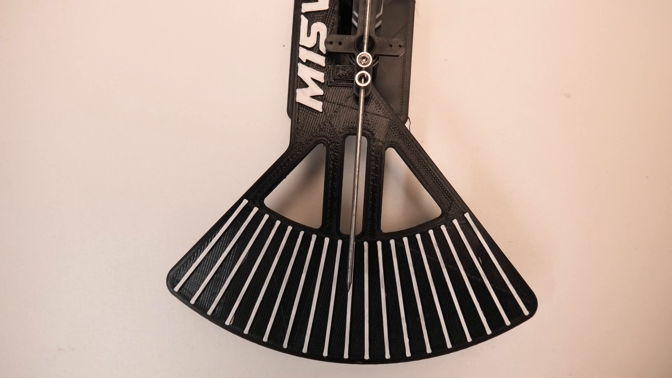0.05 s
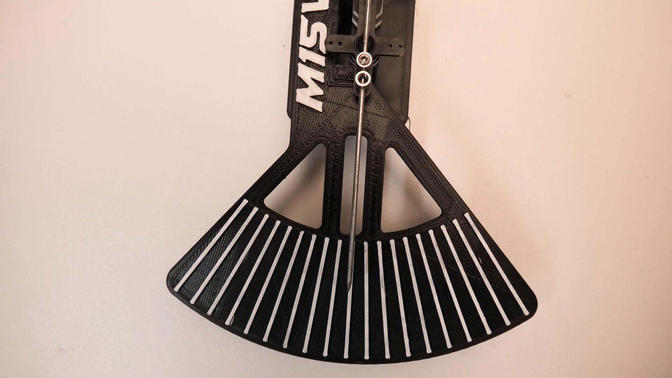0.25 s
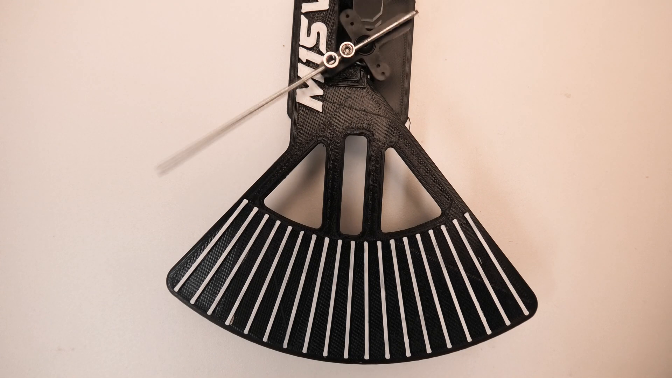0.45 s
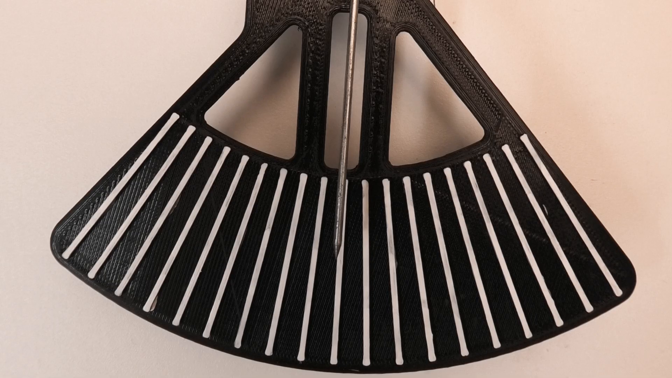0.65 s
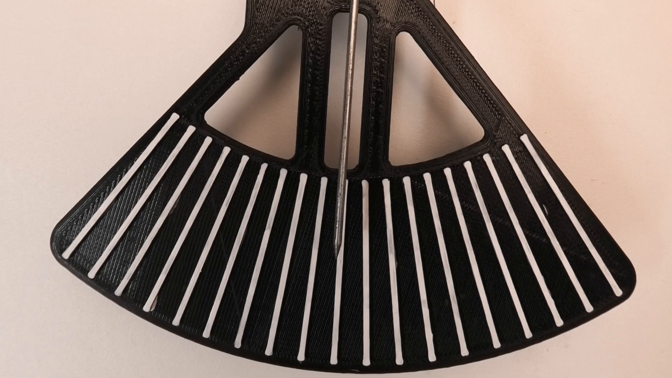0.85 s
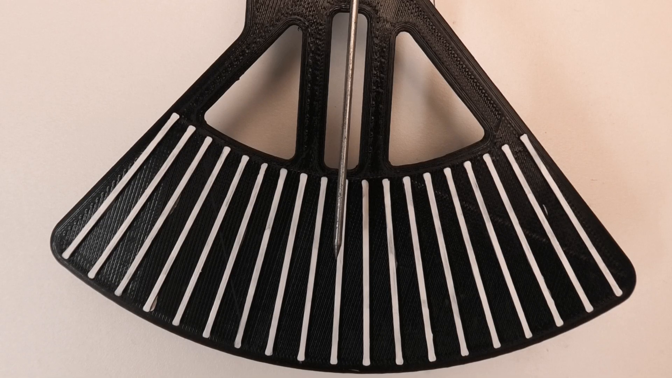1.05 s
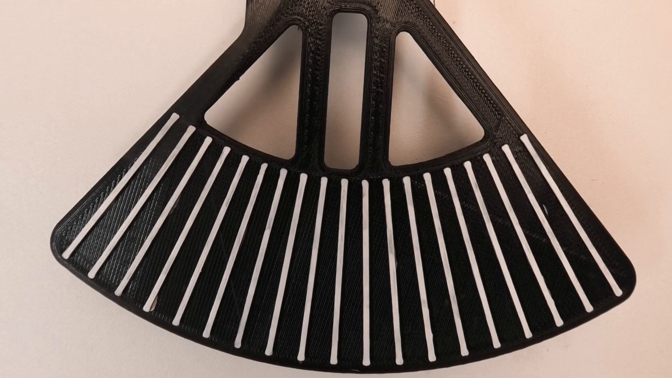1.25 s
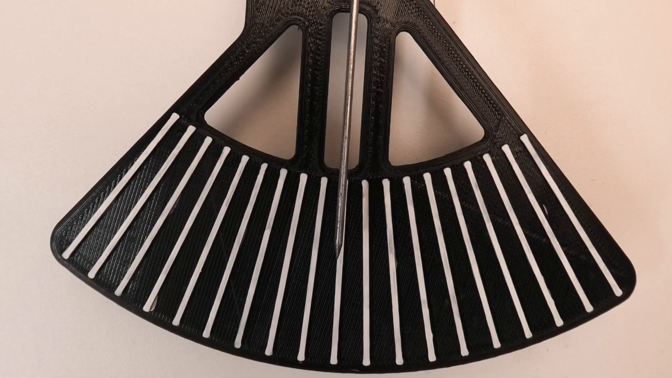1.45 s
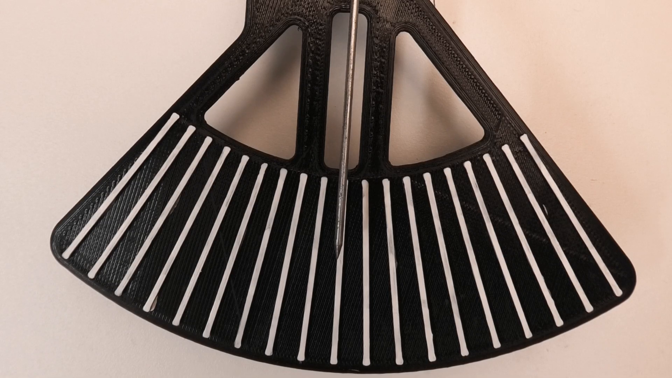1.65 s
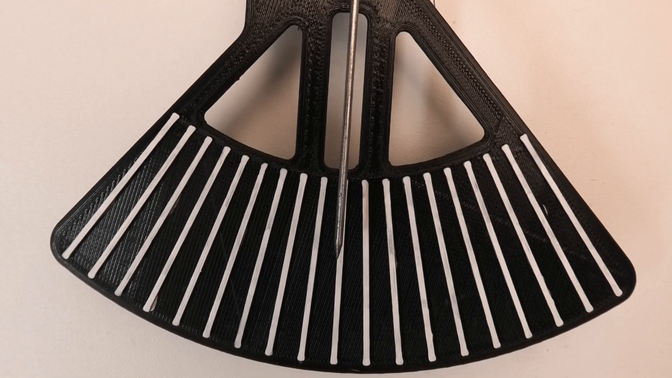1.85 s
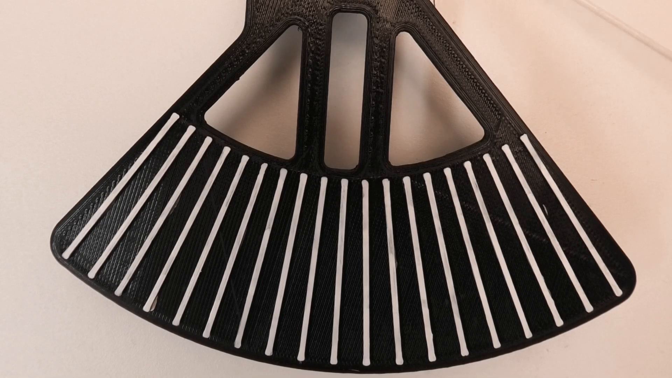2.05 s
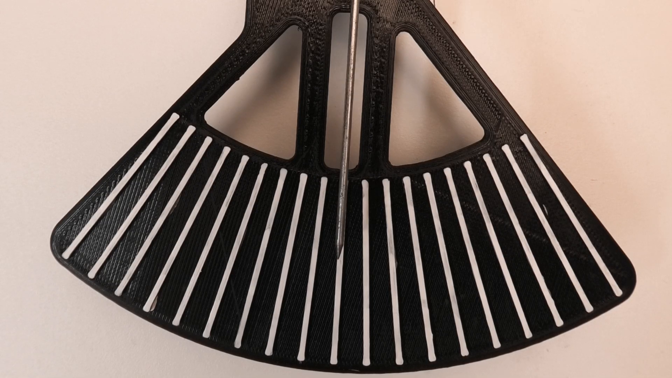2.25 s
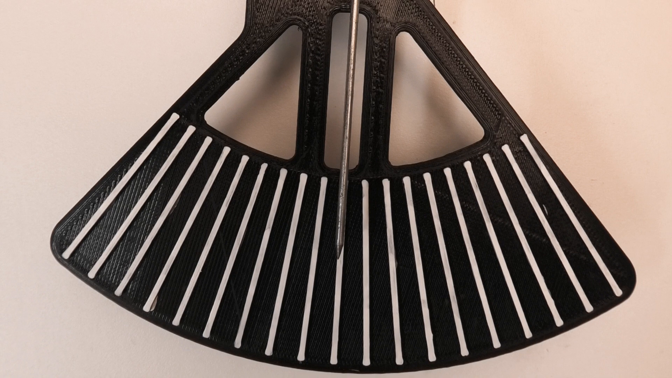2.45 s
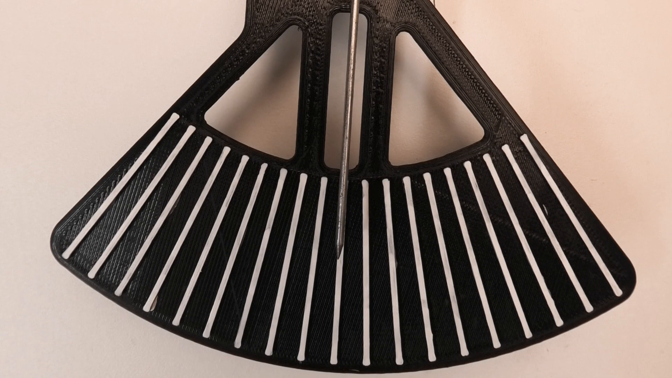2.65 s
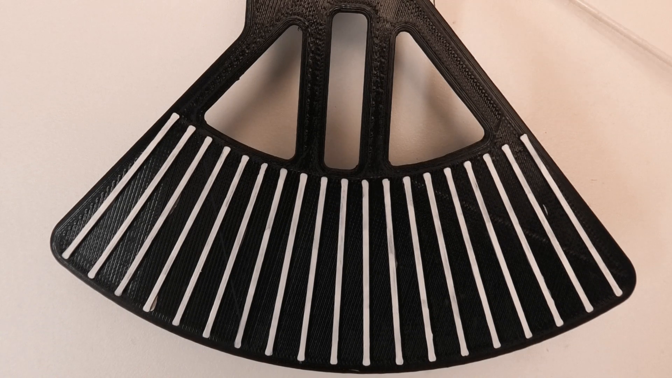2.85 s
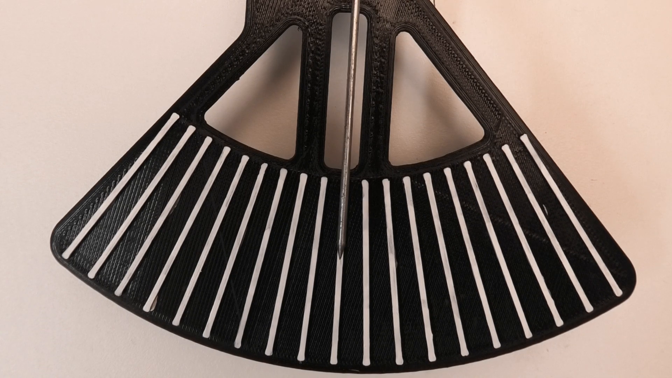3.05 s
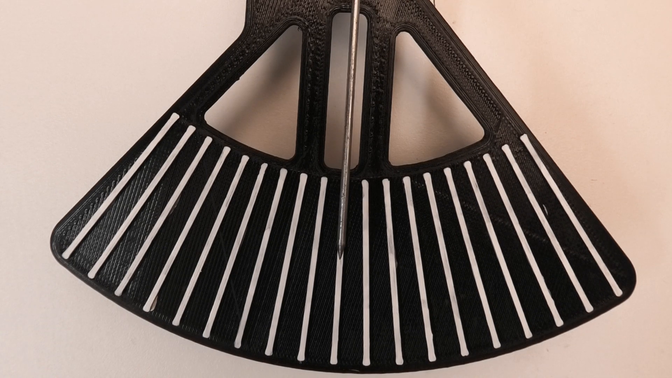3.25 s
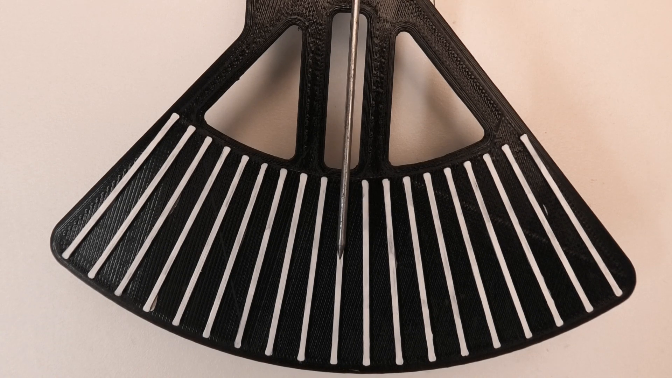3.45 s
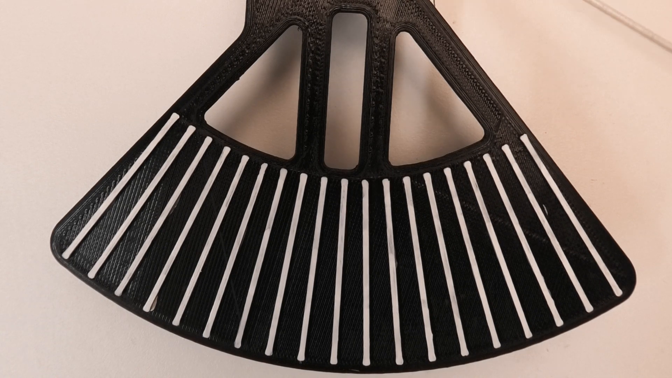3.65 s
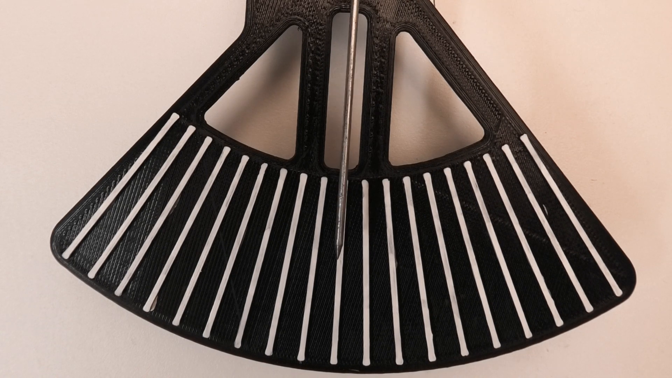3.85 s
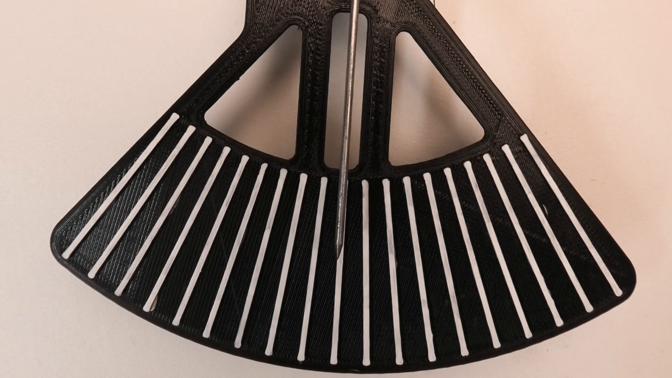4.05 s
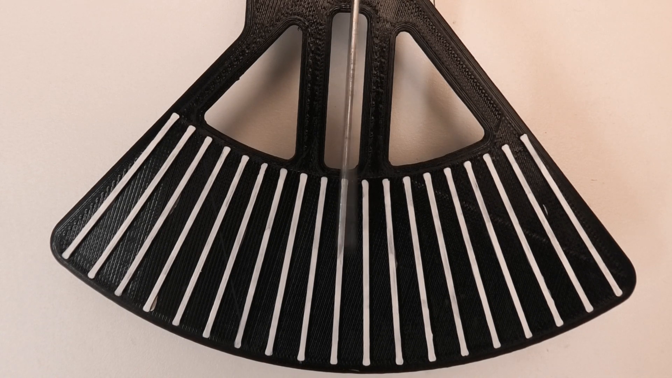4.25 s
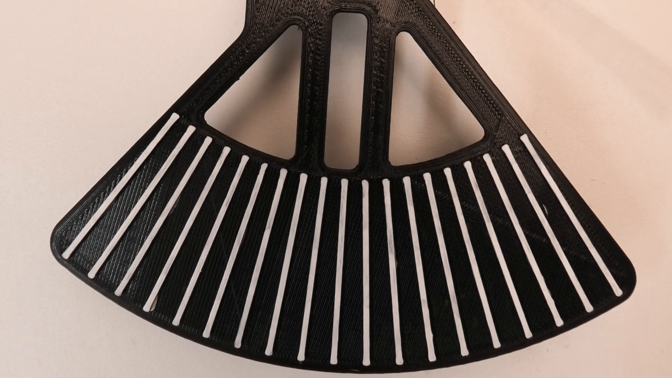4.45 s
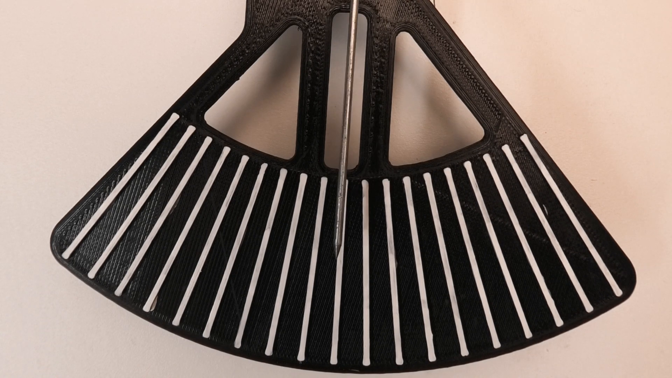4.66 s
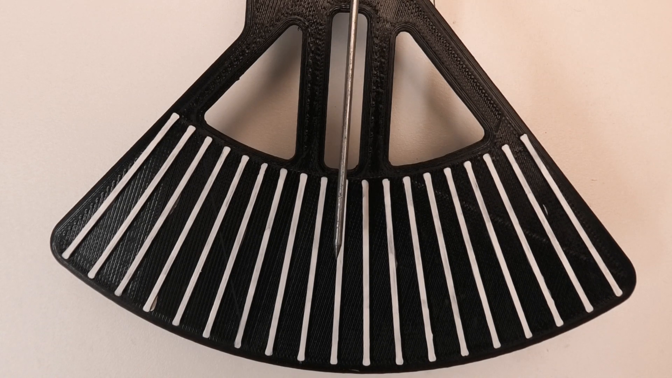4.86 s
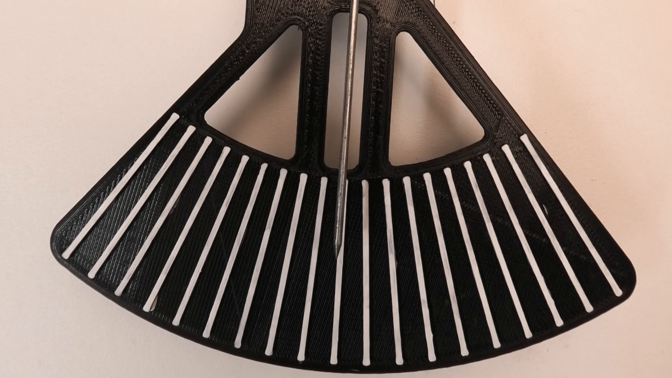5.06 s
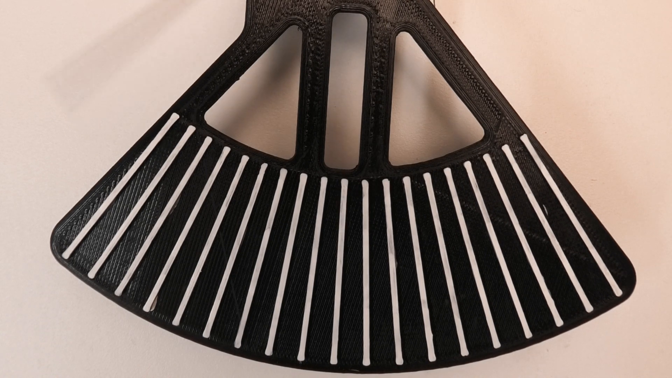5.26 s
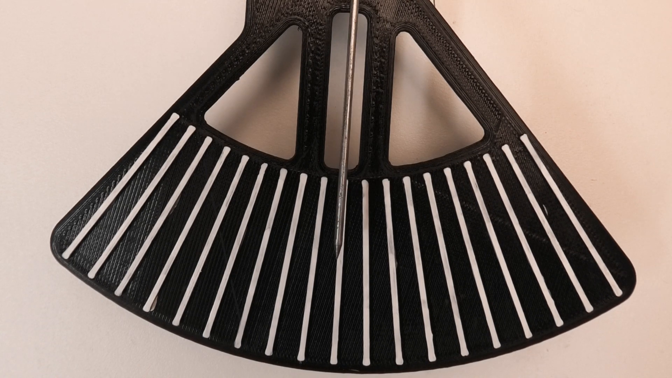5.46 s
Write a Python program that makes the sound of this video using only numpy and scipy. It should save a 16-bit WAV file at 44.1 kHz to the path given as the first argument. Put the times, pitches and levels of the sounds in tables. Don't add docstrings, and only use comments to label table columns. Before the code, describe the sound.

A fading scrape opens the scene, then a miniature electric gear motor makes seven fast double sweeps from 0.4 to 5.5 seconds. Each is two rasping, whining bursts of about a tenth of a second, almost touching, with dry backlash clicks and plastic stand buzz. Close stereo microphones catch bright tooth noise, short bench echoes and quiet hiss between.

```python
import sys
import numpy as np
from scipy import signal
from scipy.fft import rfft, irfft
from scipy.io import wavfile
from scipy.ndimage import uniform_filter1d

SR = 44100
rng = np.random.default_rng(int(sys.argv[2]) if len(sys.argv) > 2 else 0)


def waveform_to_disk(signal):
    frames = np.transpose(np.atleast_2d(signal))
    scaled = np.clip(frames, -1, 1) * 32767
    samples = np.round(scaled).astype(np.int16)
    wavfile.write(sys.argv[1], SR, samples)


def ratio(d):
    e = np.asarray(d, float) / 20
    return 10 ** e


N = 242991
T = np.arange(N) / SR
FULL_HZ = 602
PINION_TEETH, WHEEL_TEETH, SECOND_TEETH = 11, 38, 9

# drive_on_s, brake_s, motor_hz, gear_db, unbalance_db
SWEEP_OUT = [
    (.411, .497, 596.5, -21, -48),
    (1.253, 1.368, 602, -20.5, -45),
    (1.994, 2.123, 601.5, -22.5, -40),
    (2.79, 2.905, 601, -22.5, -40.5),
    (3.594, 3.722, 602, -22.5, -40.5),
    (4.352, 4.478, 603, -23, -40.5),
    (5.174, 5.287, 597, -21, -48),
]
# drive_on_s, brake_s, motor_hz, gear_db, unbalance_db
SWEEP_BACK = [
    (0.528, 0.645, 607.7, -22, -45),
    (1.39, 1.511, 609.4, -22, -44),
    (2.172, 2.294, 609.3, -23, -42.5),
    (2.925, 3.051, 613.4, -22.5, -44.5),
    (3.735, 3.87, 606.2, -24.5, -43.5),
    (4.513, 4.645, 610, -23.5, -43),
    (5.312, 5.43, 603, -22, -43.5),
]
# drive_on_s, brake_s, motor_hz, gear_db, unbalance_db
TWITCH = [
    (.372, .42, 372, -19.5, -39.5),
    (2.153, 2.163, 392.2, -25.5, -41),
    (2.752, 2.762, 204.4, -44.5, -62),
    (2.773, 2.778, 459, -23, -62),
    (3.572, 3.582, 191.4, -38.5, -56),
    (4.333, 4.337, 446, -19.5, -57.5),
    (5.153, 5.164, 204.6, -33.5, -61),
    (5.455, 5.47, 200, -37, -60),
    (.504, .516, 300, -28, -52),
    (5.176, 5.195, 420, -32, -39),
]
SPIN_OUT_MS = [9, 9, 11, 7.5, 8.5, 12.5, 13]
SPIN_BACK_MS = [11.5, 12, 10, 9.3, 13, 10, 11]
WOBBLE_DEPTH_HZ = [3, 3, 7, 8, 8, 8, 2.5]
MOTOR_ORDERS = [4, 5, 7, 8, 9, 10, 11, 12, 13, 14, 16, 17, 19, 20, 21, 22, 23, 25]
# out_db, back_db
MOTOR_ORDER_DB = [(-18, -20), (-20.5, -19), (-16, -16.5), (-33.5, -23), (-25, -22), (-30, -19), (-0.5, -1),
                  (-11.5, -20.5), (-16, -33), (-19.5, -23), (-7.5, -5), (-10, -12), (-20.5, -18),
                  (-8.5, -28.5), (-20.5, -13.5), (-3, -6), (-12, -13.5), (-31, -29.5)]
SECOND_ORDERS = [9, 12, 15, 16, 27, 36, 37, 39, 40, 45, 46, 48, 53, 54, 55, 57, 64, 65]
# out_db, back_db
SECOND_ORDER_DB = [(-12.5, -7), (-16.5, -17.5), (-22, -14.5), (-16, -24), (-38.5, -13), (-26.5, -11.5),
                   (-16, -22), (-24, -14), (-22, -10), (-11, -11), (-36.5, -12.5), (-21.5, -7), (-14, -18),
                   (-13, -22.5), (-25.5, -27.5), (-7, -23), (-16.5, -5), (-24.5, -6.5)]
# out_db, back_db
BEARING = [(-7, -27.5), (-10, -18), (-2, -4), (-2, -5), (-3, -4.5), (-1.5, -5.5), (-11, -21)]
# out_db, back_db
EDGE = [(-2, -1.5), (-6, 0.5), (1.5, 1), (0.5, -2), (0.5, -4), (0.5, -6), (-8, -1)]
# mode_hz, width_hz, level_db
CASE = [(1560, 380, -15.5), (2050, 160, -24), (2640, 110, -9), (4110, 770, -15), (4790, 570, -18.5),
        (6560, 370, -5.5), (7920, 610, -5), (9550, 227, 2), (10840, 600, -6), (12200, 900, -12.5),
        (13800, 830, -13.5), (15500, 440, -16.5)]
# mode_hz, width_hz, level_db
CLATTER = [(1387, 380, -15), (2030, 110, -4.5), (2446, 330, -5.5), (2810, 170, 0.5), (2976, 110, -11),
           (4970, 3100, -11.5)]
# peak_s, level_db, fade_ms (per 10 dB)
LASH = [(.376, -29, 81.5), (.536, -21, 18), (1.26, -34.5, 67.5), (1.414, -28.5, 24), (1.998, -28, 62),
        (2.132, -34.5, 9), (2.164, -27, 90), (2.785, -24, 44), (2.958, -29.5, 70), (3.614, -28, 7.5),
        (3.768, -29, 87), (4.336, -28, 29), (4.372, -25, 11), (4.516, -27.5, 93), (5.2, -29, 14),
        (5.324, -27.5, 41)]
# start_s, peak_db, decay_ms
TICKS = [(0.1093, -34.5, 2), (0.114, -28.5, 2.7), (2.7531, -27, 2.7), (3.418, -34, 1.5), (3.422, -30, 0.95),
         (3.5727, -28, 2.9), (4.1674, -33.5, 1.5), (4.2949, -39, 2.2), (1.254, -19.5, 1.1),
         (1.402, -20, 1.2), (1.997, -15, 2.4), (3.598, -13.5, 2), (2.779, -17, 1.6), (4.339, -13, 2.4),
         (5.179, -10.5, 1.05), (5.319, -22, 1), (5.325, -13, 1.2)]
# mode_hz, width_hz, level_db
TICK_MODES = [(2700, 600, -12.5), (4100, 540, -12.5), (7900, 490, 4), (9700, 700, -3.5), (12500, 3000, -17)]
# mode_hz, width_hz, level_db
STAND = [(336.7, 9.9, -1), (373.6, 24, 2), (466.6, 8.5, 7.5), (603, 90, -20), (785, 5.6, -2.5),
         (1860, 26, -13.5)]
# left_minus_right_db, right_lag_ms
STAND_PAN = [(-2, .08), (-2, .04), (-3, .0), (-1.5, .0), (-8, .6), (0, .02)]
# peak_s, level_db, fade_ms (per 10 dB)
RATTLE = [(.4, -47, 62), (.53, -38.5, 69), (.655, -57, 11.5), (1.262, -47, 53.5), (1.41, -42, 44),
          (2.21, -43.5, 11), (2.948, -37, 26), (3.608, -55.5, 39), (3.775, -39, 22), (4.37, -53.5, 21),
          (4.522, -37.5, 24), (5.207, -28.5, 3.5), (5.303, -36.5, 92)]
# start_s, level_db
PING = [
    (.658, -47),
    (3.06, -58),
    (5.448, -48),
]
# freq_hz, density_db (per Hz)
SCRAPE = [(710, -49.5), (1500, -26), (2300, -15.5), (2800, -1), (3500, -5.5), (4400, -20.5), (9500, -22),
          (15000, -26)]
# freq_hz, density_db (per Hz)
AIR = [(18, -30.5), (30, -6), (60, -7), (130, 1.5), (300, -3.5), (600, -11.5), (1200, -13.5), (2400, -22),
       (4000, -30), (6500, -38.5), (10000, -32), (13500, -29.5), (16500, -33)]
# freq_hz, likeness (0 to 1)
AIR_ALIKE = [(30, 0.92), (300, 0.78), (1500, 0.2), (8000, 0.71)]


def motor(strokes, creep, grip_ms, rise_ms, knee=1, wobble_hz=0):
    brake_ms, brake_sag = 21, .42
    wobble_rate_hz, wobble_lead_s = 32.8, .044
    hz, load, shake, jolt = np.zeros((4, N))
    rises, wobbles = np.resize(rise_ms, len(strokes)), np.resize(wobble_hz, len(strokes))
    for (on, off, top_hz, gear_db, rotor_db), spin_ms, uneven_hz in zip(strokes, rises, wobbles):
        i = slice(int(on * SR), int((off + brake_ms / 1000) * SR))
        since = T[i] - T[i][0]
        braked = np.clip((T[i] - off) * 1000 / brake_ms, 0, 1)
        full = top_hz + creep * (since - .08)
        full = full + uneven_hz * np.cos(2 * np.pi * wobble_rate_hz * (T[i] - off + wobble_lead_s))
        spin_up = 1 - np.exp(-(since * 1000 / spin_ms) ** knee)
        hz[i] = full * spin_up * (1 - brake_sag * braked ** 2)
        grip = (1 - np.exp(-since * 1000 / grip_ms)) ** 2 * (1 - braked ** 1.5) ** 1.5
        load[i] = ratio(gear_db) * grip
        shake[i] = ratio(rotor_db) * np.tanh(1.56 * grip)
        jolt[i.start + 200] += ratio(gear_db)
        jolt[i.stop - 300] -= 1.6 * ratio(gear_db)
    return hz, load, shake, jolt


def whine(hz, load, way, whine_db=-5.5, flicker_db=2.0, power=0.83, coupling=0.45):
    on = np.flatnonzero(hz)
    slip = 0.0028 + 0.0512 * np.clip(1 - hz[on] / FULL_HZ, 0, 1)
    turns = np.cumsum(hz[on] * (1 + slip * walk(300, len(on)))) / SR
    starts = [stroke[0] for stroke in (SWEEP_OUT, SWEEP_BACK)[way]]
    sweep = np.searchsorted(starts, T[on] + .01) - 1
    bearing_db = np.array(BEARING)[sweep, way]
    edge_db = np.array(EDGE)[sweep, way]
    orders = [(order, row[way] + edge_db * (order >= 20)) for order, row in zip(MOTOR_ORDERS, MOTOR_ORDER_DB)]
    orders += [(order * PINION_TEETH / WHEEL_TEETH, row[way] + bearing_db)
               for order, row in zip(SECOND_ORDERS, SECOND_ORDER_DB)]
    song, angle = np.zeros((2, N))
    for order, db in orders:
        flare = (case_gain(order * hz[on]) / case_gain(order * FULL_HZ)) ** coupling
        size = ratio(db + flicker_db * walk(89.9, len(on))) * flare
        song[on] += size * np.sin(2 * np.pi * (order * turns + rng.random()))
    angle[on] = turns
    song = song * np.exp(np.minimum(np.gradient(hz) * SR, 0) / 7000)
    return ratio(whine_db) * np.sqrt(2) * load * (hz / FULL_HZ) ** power * song, angle


def case_gain(hz):
    grid_hz = np.linspace(0, SR / 2, num=1024)
    through = sum(ratio(2 * db) / (1 + (2 * (grid_hz - mode_hz) / width) ** 2) for mode_hz, width, db in CASE)
    return np.interp(hz, grid_hz, np.sqrt(through))


def chatter(load, turns, chatter_db=-4.5, lash_db=-4.5):
    second_mesh = SECOND_TEETH * PINION_TEETH / WHEEL_TEETH
    puffs = 1 + 0.54 * np.cos(2 * np.pi * second_mesh * turns) + .25 * np.cos(2 * np.pi * turns)
    hits = puffs * ratio(.7 * walk(400)) * rng.standard_normal(N)
    knocks = (rng.random(N) < .04) * ratio(3.8 * walk(150)) * rng.standard_normal(N)
    ringing = load * level(body(hits, CASE), chatter_db)
    clatter = slack(load) * level(body(knocks, CLATTER), lash_db)
    return above(ringing + clatter, 1300)


def slack(load, swell_ms=12, run_db=-23):
    stops = [(stroke[1] + 0.017, -31, 5) for stroke in SWEEP_BACK]  # peak_s, level_db, fade_ms
    touching = np.tanh(uniform_filter1d(load, size=400) * ratio(39))
    return touching * (bursts(LASH, swell_ms) + bursts(stops, swell_ms)) + ratio(run_db) * load


def ticks():
    out = np.zeros(N)
    for (s, db, ms), noise in zip(TICKS, rng.standard_normal((len(TICKS), 400))):
        start = int(s * SR)
        out[start:start + 400] += ratio(db) * noise * np.exp(-T[:400] * 1000 / ms)
    return ratio(6.0) * body(out, TICK_MODES)


def stand(push):
    out = np.zeros((2, N))
    for (hz, width, db), (pan_db, lag_ms) in zip(STAND, STAND_PAN):
        mode = ratio(db) * ring(push, hz, width)
        lagged = np.interp(T - lag_ms / 1000, T, mode)
        out += [ratio(pan_db / 2) * mode, ratio(-pan_db / 2) * lagged]
    return out


def rattle(load, swell_ms=5, run_db=-44):
    shaken = bursts(RATTLE, swell_ms) + ratio(run_db) * load
    return shaken * level(ratio(3.1 * walk(150)) * rng.standard_normal(N), 21.34)


def settle(settle_db=-59.5, peak_s=.055):
    since = np.clip(T - np.array([[stroke[1]] for stroke in SWEEP_BACK]), 0, None) / peak_s
    quiver = level(ring(rng.standard_normal(N), 1910, 110), settle_db)
    return np.sum(since * np.exp(1 - since), axis=0) * quiver


def ping(hz=805, t60_s=.4, pan_db=-5):
    since = np.clip(T - np.array(PING)[:, :1], 0, None)
    fading = ratio(np.array(PING)[:, 1:] - 60 * since / t60_s)
    tone = np.sum(fading * np.sin(2 * np.pi * hz * since), axis=0)
    return tone * ratio(np.array([[pan_db], [-pan_db]]) / 2)


def scrape(scrape_db=-37, t60_s=0.23):
    return level(coloured(SCRAPE), scrape_db) * ratio(-60 * T / t60_s + 1.5 * walk(260))


def ports(x, side_db=-9.5):
    side = 0.62 * ring(x, 12500, 5000) - 0.59 * ring(x, 10000, 2500) - 1.1 * ring(x, 1600, 200)
    reflection = ring(np.roll(x, shift=330), 12600, 4000)
    side = ratio(side_db) * side + ratio(-18.5) * reflection
    return np.array([x - side, x + side])


def room(x, early_db=-12, early_t60=0.23, late_db=-24, late_t60=0.41, apart=0.25):
    t = T[:SR // 2]
    noise = rng.standard_normal((2, 1, len(t))) + apart * rng.standard_normal((2, 2, len(t)))
    early = noise[0] * ratio(-60 * t / early_t60)
    late = signal.lfilter([.45], [1, -.55], noise[1]) * ratio(-60 * t / late_t60)
    echo = sum(ratio(db) * h / np.sqrt(np.sum(h ** 2) / 2) for h, db in ((early, early_db), (late, late_db)))
    return signal.fftconvolve(x[None], echo, axes=1)[:, :N]


def air(air_db=-50.5):
    mid, side = rfft(coloured(AIR)), rfft(coloured(AIR))
    alike = np.clip(on_log(np.fft.rfftfreq(N, 1 / SR), AIR_ALIKE), 0, 1)
    opposed = np.array([[1], [-1]])
    both = irfft(np.sqrt(1 + alike) * mid + np.sqrt(1 - alike) * side * opposed, N)
    return level(both * ratio(.7 * walk(3)), air_db)


def level(x, db):
    return x * ratio(db) / np.sqrt(np.mean(x ** 2))


def ring(x, hz, width):
    return signal.lfilter(*signal.iirpeak(hz, hz / width, SR), x)


def body(x, modes):
    return sum((-1) ** k * ratio(db) * ring(x, hz, width) for k, (hz, width, db) in enumerate(modes))


def above(x, hz):
    return signal.sosfilt(signal.butter(3, hz, "high", fs=SR, output="sos"), x)


def bursts(rows, swell_ms):
    return sum(ratio(db - 10 * 1000 * np.maximum((s - T) / swell_ms, (T - s) / fade_ms)) for s, db, fade_ms in rows)


def walk(rate, n=N):
    k = int(SR / rate)
    held = np.repeat(rng.standard_normal(n // k + 1), k)
    return 1.342 * uniform_filter1d(uniform_filter1d(held, k), k)[:n]


def on_log(hz, table):
    at, value = np.transpose(table)
    return np.interp(np.log(np.maximum(hz, 1)), np.log(at), value)


def coloured(table):
    return irfft(rfft(rng.standard_normal(N)) * ratio(on_log(np.fft.rfftfreq(N, 1 / SR), table)), N)


def scene():
    out = motor(SWEEP_OUT, -41.5, 2, SPIN_OUT_MS, 1.3, WOBBLE_DEPTH_HZ)
    back = motor(SWEEP_BACK, 170, 2.4, SPIN_BACK_MS, .95)
    hz, load, shake, jolt = motor(TWITCH, 0, 1.3, 6.5)
    turns, song = np.cumsum(hz) / SR, 0
    for way, (way_hz, way_load, way_shake, way_jolt) in enumerate((out, back)):
        sung, angle = whine(way_hz, way_load, way)
        song = song + sung
        turns = np.where(way_hz > hz, angle, turns)
        hz = np.maximum(hz, way_hz)
        load = np.maximum(load, way_load)
        shake = np.maximum(shake, way_shake)
        jolt = jolt + way_jolt
    whirr = above(song, 1350) + chatter(load, turns) + settle()
    push = ratio(18) * shake * np.sin(2 * np.pi * turns) + ratio(37) * uniform_filter1d(jolt, size=70)
    loose_left, loose_right = rattle(load), rattle(load)
    knocks = ring(ring(np.array([loose_left, loose_right]), 690, 330), 1200, 760)
    hum = ratio(-10.5 + 3 * walk(60)) * shake * (hz / FULL_HZ) ** 4 * np.sin(4 * np.pi * turns)
    near = whirr + hum + ticks() + scrape()
    plate = above(stand(push + ratio(1.5) * loose_left), 270) + knocks
    plate = plate + ratio(4) * above(stand(loose_right), 270)[0] * np.array([[1], [-1]])
    return ports(near) + plate + room(near + 1.73 * plate[0]) + ping() + air()


def low_pass(x):
    return signal.sosfilt(signal.butter(12, 16990, fs=SR, output="sos"), x)


def record(dry):
    mix = signal.sosfilt(signal.ellip(8, .2, 70, 15900, fs=SR, output="sos"), dry)
    return low_pass(mix)


dry = scene()
out = record(dry)
waveform_to_disk(out)
```